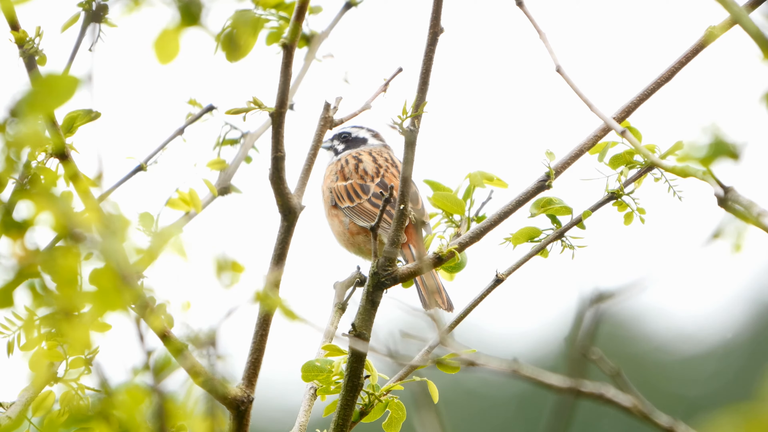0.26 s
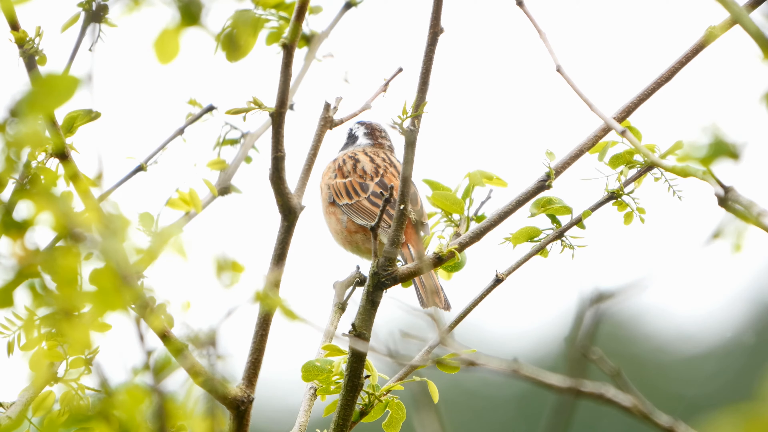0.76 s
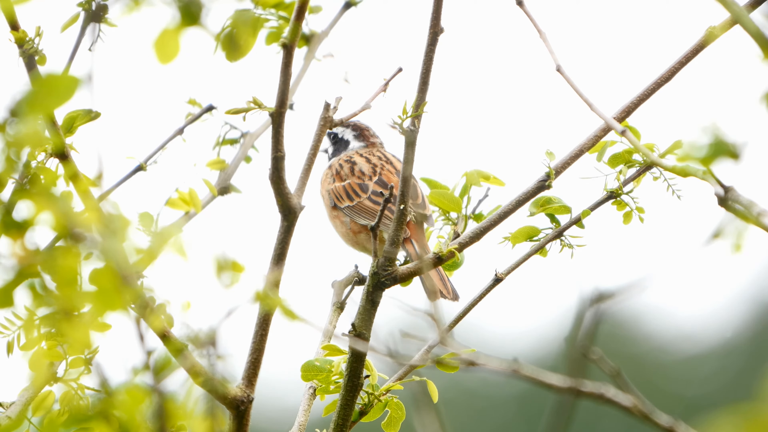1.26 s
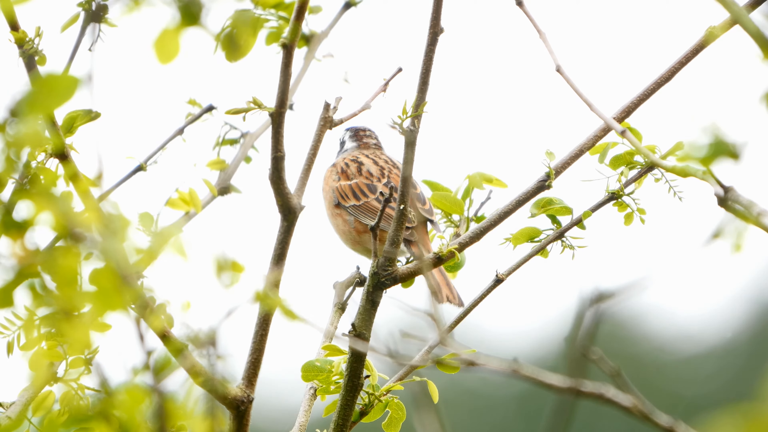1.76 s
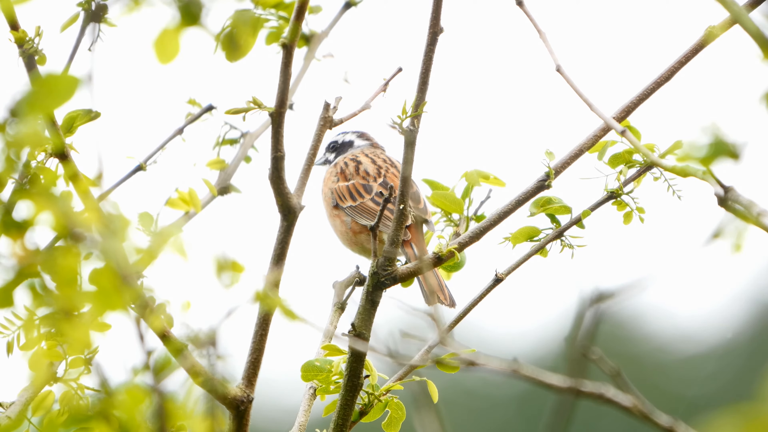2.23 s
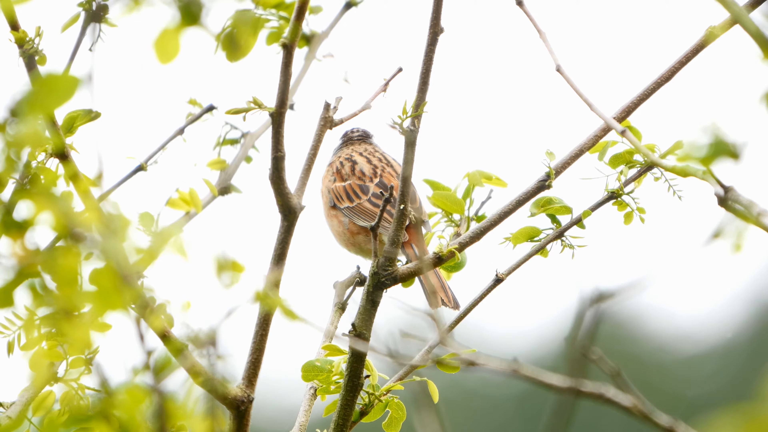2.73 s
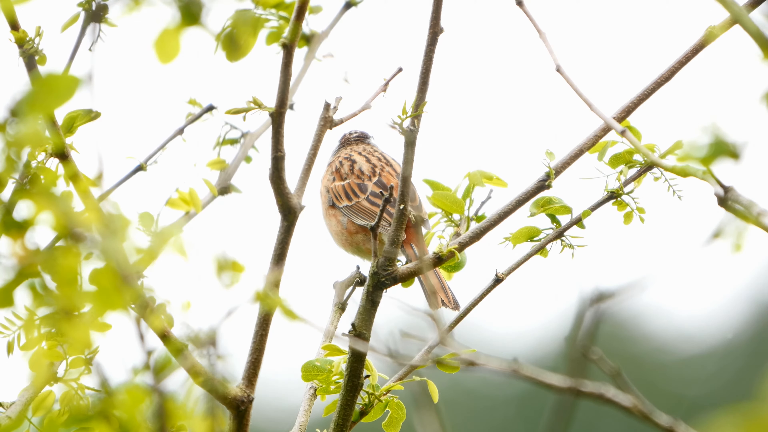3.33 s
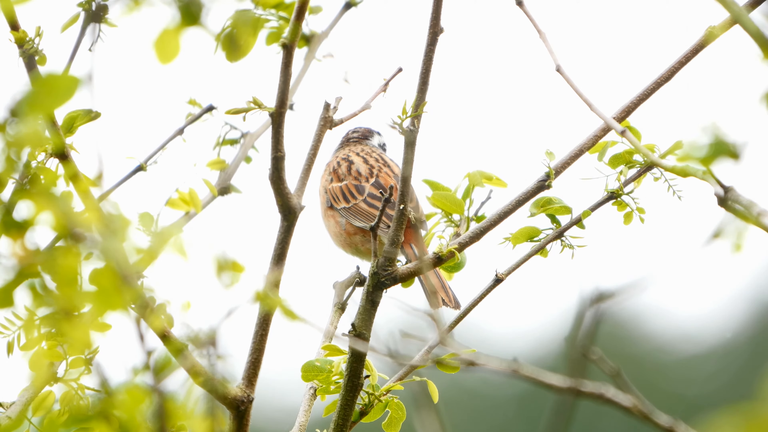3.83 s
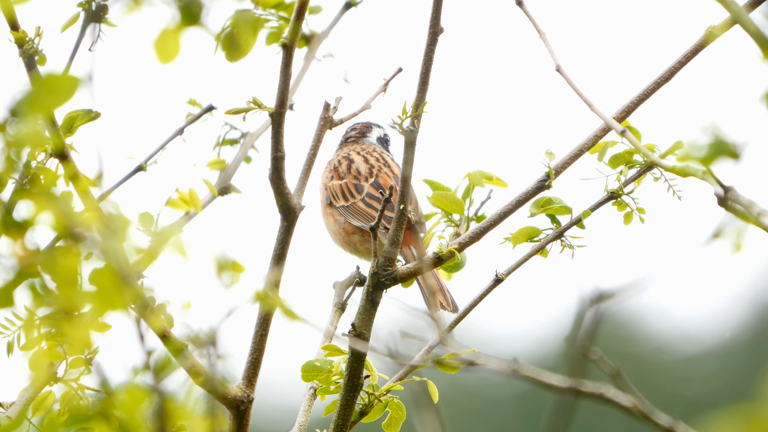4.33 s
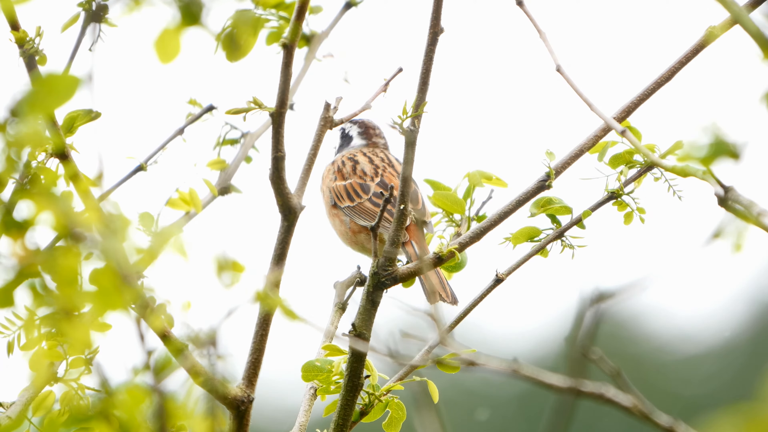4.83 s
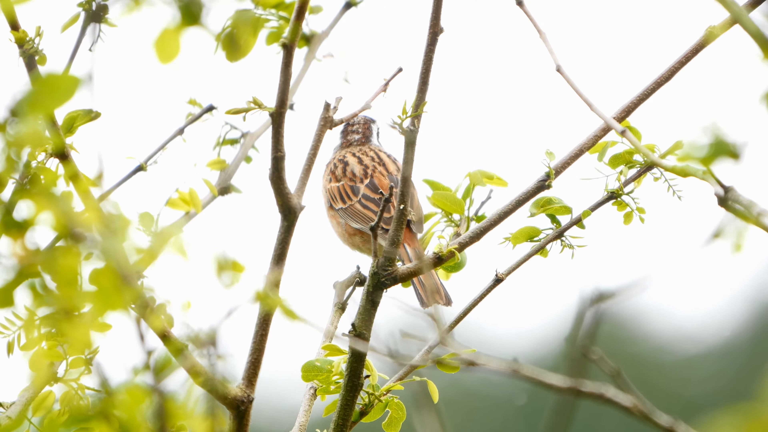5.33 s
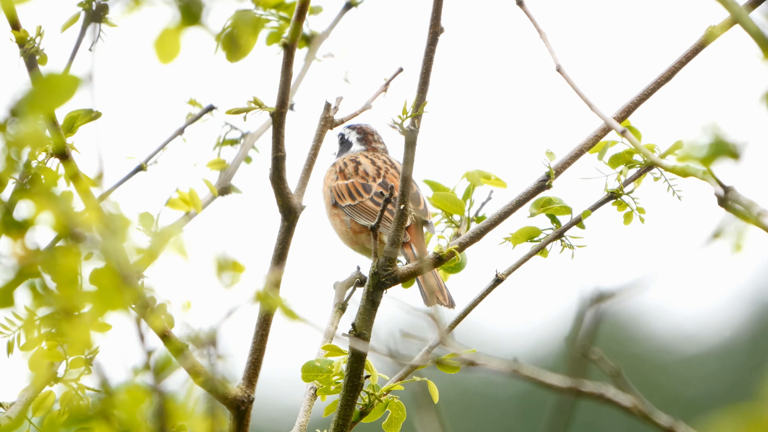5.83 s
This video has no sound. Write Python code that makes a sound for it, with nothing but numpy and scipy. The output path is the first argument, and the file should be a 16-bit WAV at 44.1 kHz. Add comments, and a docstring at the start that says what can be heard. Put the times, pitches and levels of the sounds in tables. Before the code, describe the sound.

Open woodland, mono pickup: constant muffled air noise with a barely audible drone and scattered faraway chirps. Early on, one near bird sings a bright, hurried string of pure sweeping whistles and tiny chips, each with a short echo from the trees. Softer, blurred bird calls fill the gap, including a slowing series of piped notes, before the same song starts again, slightly slower, and is cut off by the ending.

```python
"""Distant air rushes steadily over a faint low drone, and far chirps fall at random moments throughout.
A meadow bunting on a branch soon sings a quick phrase of pure sliding whistles, sines on pitch paths;
twigs and trunks scatter each note into a short tail. Other birds whistle further off, a low rumble
swells once, a far bird pipes a slowing series, and the bunting repeats its phrase a little slower."""
import sys
import numpy as np
from scipy import signal
from scipy.fft import rfft, irfft, next_fast_len
from scipy.io import wavfile
from scipy.ndimage import uniform_filter1d, map_coordinates

SR = 44100
rng = np.random.default_rng(int(sys.argv[2]) if len(sys.argv) > 2 else 0)


def file_out(sig):
    """Save sig as 16-bit WAV at sys.argv[1]."""
    # one column per channel
    cols = np.atleast_2d(sig).T
    # limit, then scale
    lim = np.clip(cols, -1, 1)
    pcm = np.round(lim * 32767).astype(np.int16)
    wavfile.write(sys.argv[1], SR, pcm)


N = 268569

# Whistled syllables. Each: attack in s, release in s, swell over the note in dB, warble depth in Hz,
# pitch path of (s into the note, Hz) before any stretch or pitch ratio.
TICK = (.003, 0.0048, 3, 0, [(0, 5360), (.021, 4320)])
ARCH = (0.027, 0.0074, 1, 0, [(0, 3678), (.035, 4127), (.064, 4342), (.081, 3580), (.087, 6670)])
SLUR = (0.028, 0.0049, 6.2, 0, [(0, 6420), (.022, 5625), (.081, 5030)])
LIFT = (0.0049, .005, 0, 0, [(0, 4820), (.006, 5150), (.017, 5900)])
SLIDE = (.003, 0.015, 6.8, 0, [(0, 4860), (.016, 4200), (.034, 3945), (.07, 3692), (.124, 3530),
         (.143, 3270)])
FALL = (0.023, 0.004, 4.5, 490, [(0, 6380), (.025, 5417), (.046, 4930)])
PEAK = (0.0087, 0.0043, 0.84, 0, [(0, 3990), (.018, 5024), (.031, 4180), (.047, 3834)])
LISP = (0.017, 0.0098, 0, 0, [(0, 8300), (.021, 7040)])
# The other side of the syrinx, sounding together with the lisp; same columns.
SECOND_VOICE = (0.0084, .006, 1, 0, [(0, 8150), (.016, 8840)])
FLICK = (0.0096, 0.0067, 0, 0, [(0, 10240), (.007, 7680), (.014, 7050)])
RISE = (0.03, 0.003, -8.5, 0, [(0, 4670), (.019, 4590), (.035, 4970), (.051, 5520), (.075, 5750)])
CHUP = (0.0031, 0.004, 0.67, 0, [(0, 4800), (.005, 2800), (.011, 3690), (.021, 3730), (.034, 2273)])
STEP = (0.021, 0.0091, 5.8, 0, [(0, 6700), (.014, 6950), (.03, 7060), (.045, 6380), (.077, 6434)])
CHIP = (0.0038, 0.0028, -1.3, 0, [(0, 4295), (.009, 4503), (.02, 3780)])
SEEP = (0.042, 0.018, 0, 0, [(0, 9860), (.03, 8750), (.07, 8420), (.12, 9380)])
# Syllables of the birds further off; same columns.
BOW = (0.022, 0.019, -0.5, 0, [(0, 3050), (.02, 3757), (.05, 4128), (.074, 4136), (.097, 3800),
       (.124, 2330), (.145, 2360)])
SWOOP = (0.0076, 0.0021, -2, 0, [(0, 2215), (.02, 3340), (.033, 5300), (.065, 6640), (.115, 7860),
         (.135, 2980)])
DROP = (0.014, .008, -10, 0, [(0, 4275), (.02, 2714), (.048, 1780)])
GLIDE = (0.023, 0.01, 0, 0, [(0, 5920), (.07, 4750), (.135, 4150)])
SIGH = (0.012, 0.0041, -5, 0, [(0, 3170), (.025, 3220), (.088, 2450)])
BURR = (0.022, 0.031, 0, 280, [(0, 2693), (.095, 4390)])
QUERY = (0.023, 0.044, 0, 0, [(0, 2920), (.03, 3450), (.095, 4070)])


def amp(db):
    """Decibels to gain."""
    return 10 ** (np.asarray(db) / 20)


def at(s, rows):
    """(s, value) rows read at time s."""
    return np.interp(s, *np.transpose(rows))


def along(points, hz):
    """(Hz, value) points read on a log frequency axis."""
    f, v = np.transpose(points)
    return np.interp(np.log(hz + 1), np.log(f + 1), v)


def curve(rows):
    """(s, value) rows as one value per sample."""
    return at(np.arange(N) / SR, rows)


def wobble(rate_hz, size):
    """Smooth random curve through rate_hz knots a second."""
    knots = rng.standard_normal(int(size * rate_hz / SR) + 4)
    return map_coordinates(knots, [np.arange(size) * rate_hz / SR])


def filtered(x, response):
    """x times a response of frequency, zero-padded against wrap-around."""
    m = next_fast_len(N + 8192)
    return irfft(rfft(x, m) * response(np.fft.rfftfreq(m, 1 / SR)), m)[:N]


def noise(response):
    """Coloured noise of rms 1."""
    x = filtered(rng.standard_normal(N), response)
    return x / np.sqrt(np.mean(x ** 2))


def add(track, s, sound):
    """Mix a sound into the track at time s."""
    room_left = track[round(s * SR):][:len(sound)]
    room_left += sound[:len(room_left)]


def whistle(syllable, ratio=1, stretch=1, warble_rate_hz=180, warble_life_s=0.023, jitter=0.006,
            overtone_db=-41, throat_hz=3900, edge_db=24, edge_curve=1.51):
    """The syrinx glides along a pitch path under attack, swell and release, any warble at the start."""
    attack_s, release_s, swell_db, warble_hz, path = syllable
    path_s, path_hz = np.transpose(path)
    path_s = stretch * path_s
    t = np.arange(int(path_s[-1] * SR)) / SR
    to_end = t[-1] - t

    glide = uniform_filter1d(np.interp(t, path_s, path_hz), size=160)
    pitch = ratio * glide * (1 + jitter * wobble(400.3, len(t)))
    warble_fade = np.exp(-(t / warble_life_s) ** 4)
    pitch += warble_hz * np.sin(2 * np.pi * warble_rate_hz * t) * warble_fade
    phase = 2 * np.pi * np.cumsum(pitch) / SR

    edges = np.clip(1 - np.minimum(t / attack_s, to_end / release_s), 0, 1) ** edge_curve
    fade = np.clip(np.minimum(t, to_end) / .001, 0, 1)  # 1 ms against clicks
    envelope = fade * amp(swell_db * (t / t[-1] - .5) - edge_db * edges)
    # the throat passes the overtone only on the lowest notes
    overtone = amp(overtone_db) / (1 + (pitch / throat_hz) ** 20)
    return np.sqrt(2) * envelope * (np.sin(phase) + overtone * np.sin(2 * phase))


def among_trees(x, twigs_db, wood_db, twig_span_s=.03, build_up_s=0.0025, count=14):
    """Direct note, sharp branch echoes that beat with it, and the wood's diffuse tail."""
    # Reverberation of the wood. Each row: frequency in Hz, 60 dB decay time in s.
    wood_decay = [(2000, 0.33), (4000, 0.44), (6500, 0.38), (10000, 0.083)]
    hz, t, z = signal.stft(rng.standard_normal(SR * 2 // 3), SR, nperseg=256)
    decay = amp(-60 * t / along(wood_decay, hz)[:, None])
    build_up = 1 - np.exp(-t / build_up_s)
    tail = signal.istft(z * decay * build_up, SR, nperseg=256)[1]
    response = amp(wood_db) * tail / np.linalg.norm(tail)
    delays = (SR * (0.0028 + twig_span_s * rng.random(count))).astype(int)
    response[delays] += amp(twigs_db) * rng.choice([-1, 1], count) / np.sqrt(count)
    response[0] = 1  # direct sound
    return signal.fftconvolve(x, response)


def air_rush(trim_db=1.38):
    """Distant air: broadband noise, its level slightly unsteady."""
    # Spectrum of the rush. Each row: frequency in Hz, relative density in dB per Hz.
    air_spectrum = [(25, -30), (69, -11), (110, -7.5), (260, -4.5), (433, -9), (760, -3), (1110, -5),
                    (2000, -8.5), (3000, -10.5), (3550, -16.5), (4260, -24.5), (6500, -30.5), (11000, -35),
                    (15500, -36)]
    # Course of the rush. Each row: time in s, level in dB before the trim.
    air_level = [(0.0, -47.5), (4.02, -47), (4.27, -46.5), (5.8, -46.5), (6.09, -47.5)]
    level_db = curve(air_level) + trim_db + 0.15 * wobble(7.4, N)
    return amp(level_db) * noise(lambda hz: amp(along(air_spectrum, hz)))


def low_drone(trim_db=-1.0):
    """Faint drone: noise through two narrow resonances."""
    # Resonances. Each row: centre in Hz, width in Hz, relative level in dB.
    resonances = [(285.5, 24, -8), (325.2, 23, -3.5)]
    # Course of the drone. Each row: time in s, level in dB before the trim.
    drone_level = [(0, -57.5), (3.7, -57), (3.88, -49.5), (4.05, -63), (6.09, -54.5)]

    def response(hz):
        """Sum of the resonance peaks."""
        return sum(amp(db) / (1 + np.square(2 * (hz - centre_hz) / width_hz))
                   for centre_hz, width_hz, db in resonances)

    return amp(curve(drone_level) + trim_db) * noise(response)


def rumble(peak_s=2.54, width_s=0.44, peak_db=-54):
    """Low band of noise that swells once on a Gaussian curve."""
    band = [(80, -40), (180, -1), (290, -7), (420, -43.5), (2000, -100)]  # (Hz, relative dB)
    swell = np.exp(-np.square((np.arange(N) / SR - peak_s) / width_s))
    return amp(peak_db) * swell * noise(lambda hz: amp(along(band, hz)))


def chorus(level_db=-63, spread=.18, count=44):
    """Farthest birds: faint chirps at random moments, heavy with echo."""
    out = np.zeros(N)
    for when, kind, pitch in rng.random((count, 3)):
        syllable = SIGH if kind < .5 else QUERY
        note = whistle(syllable, .86 + spread * (2 * pitch - 1), jitter=0.034)
        add(out, when * N / SR, amp(level_db) * among_trees(note, twigs_db=-2, wood_db=-7.5))
    return out


def piping_bird(count=19):
    """One far rising note about nine times a second, slowing a little and creeping up in pitch."""
    # The piped note. Columns: attack in s, release in s, swell over the note in dB, warble depth in Hz,
    # pitch path of (s into the note, Hz) before the pitch ratio.
    pipe_note = (0.014, 0.031, -7.5, 0, [(0, 1763), (.025, 1908), (.07, 2070)])
    # Loudness of the series. Each row: time in s, level in dB.
    pipe_level = [(3.74, -55), (4.4, -49), (4.9, -54), (5.7, -52)]
    start_s, gap_s, slowing_s = 3.74, .106, .00054  # slowing_s: growth of each gap
    start_ratio, climb_per_s = 0.99, 0.0199  # pitch ratio and its rise
    out = np.zeros(N)
    for k in range(count):
        elapsed_s = k * (gap_s + slowing_s * k / 2)
        s = start_s + elapsed_s
        note = whistle(pipe_note, start_ratio + climb_per_s * elapsed_s)
        add(out, s, amp(at(s, pipe_level)) * among_trees(note, twigs_db=-17.5, wood_db=-4.5))
    return out


def far_birds(flutter_db=0.5):
    """Distant whistles flutter and dull on their way through leaves; their echo builds up slowly."""
    # Birds deeper in the wood. Each row: start in s, syllable, level in dB before the foliage, pitch ratio.
    neighbours = [(1.345, SIGH, -49.5, 0.96), (1.809, QUERY, -52.5, .74), (1.94, SIGH, -49.5, 0.96),
                  (1.964, BURR, -50.5, 1.5), (2.004, QUERY, -52.5, 1.12), (2.105, DROP, -42.5, 0.92),
                  (2.14, SIGH, -53.5, 1.14), (2.531, SIGH, -50, 0.97), (2.885, QUERY, -48.5, 1.03),
                  (2.96, BURR, -52.5, 1.06), (3.04, BURR, -46.5, .94), (3.27, SWOOP, -49.5, 1),
                  (3.515, BOW, -45.5, .99), (3.628, QUERY, -61, 1.23), (3.786, SWOOP, -48, 1.01),
                  (3.795, QUERY, -55.5, 1.1), (4.018, BOW, -44.5, 1), (4.029, GLIDE, -51.5, 1.01),
                  (4.295, BOW, -46, 1.025), (4.572, BOW, -46, 1.044), (4.691, QUERY, -47, 0.88),
                  (5.587, QUERY, -44, 0.87), (6.071, BOW, -35, 0.88)]
    # Treble lost to the leaves. Each row: frequency in Hz, gain in dB.
    foliage = [(4200, -1.5), (5200, -12), (7700, -22)]
    out = np.zeros(N)
    for s, syllable, db, ratio in neighbours:
        note = whistle(syllable, ratio, warble_rate_hz=87, warble_life_s=0.095, jitter=0.008)
        note = note * amp(db + flutter_db * wobble(64.8, len(note)))
        add(out, s, among_trees(note, twigs_db=-7.0, wood_db=-9.5, build_up_s=0.11))
    return filtered(out, lambda hz: amp(along(foliage, hz)))


def bunting():
    """Near singer, phrase given twice; its head turns, so each syllable meets different branches."""
    # The phrase. Each row: first start in s, syllable, level in dB, level in the repeat in dB.
    song = [(.391, TICK, -36, -37.5), (0.537, ARCH, -29, -29.5), (0.624, SLUR, -30.5, -30),
            (.785, LIFT, -34, -36), (0.794, SLIDE, -26, -26), (0.984, FALL, -29.5, -30),
            (1.032, PEAK, -28.5, -28.5), (1.119, FALL, -31.5, -30.5), (1.168, PEAK, -28, -28.5),
            (1.258, SECOND_VOICE, -53, -48.5), (1.259, LISP, -36, -35.5), (1.277, FLICK, -36.5, -39),
            (1.32, SECOND_VOICE, -50.5, -47), (1.322, LISP, -36.5, -34.5), (1.339, FLICK, -34.5, -37),
            (1.388, RISE, -29, -31), (1.463, CHUP, -32, -31.5), (1.537, STEP, -33, -35),
            (1.628, CHIP, -35.5, -35), (1.689, CHIP, -34.5, -33), (1.743, CHIP, -32.5, -33),
            (1.819, SEEP, -49, -56)]
    # The beak points away in the second phrase. Each row: time in s, overtone level in dB.
    beam = [(.8, -37), (4.8, -49)]
    repeat_after_s, repeat_drag = 4.251, 0.0035  # drag: share by which the repeat is slower
    slide_hurry = 0.95  # share of its time the long slide takes in the repeat
    out = np.zeros(N)
    for first_s, syllable, first_db, again_db in song:
        again_s = first_s + repeat_after_s + repeat_drag * (first_s - song[0][0])
        hurry = slide_hurry if syllable == SLIDE else 1
        for s, db, stretch in ((first_s, first_db, 1), (again_s, again_db, hurry)):
            note = whistle(syllable, stretch=stretch, overtone_db=at(s, beam))
            add(out, s, amp(db) * among_trees(note, twigs_db=-9.0, wood_db=-12.0))
    return out


def scene():
    """Everything at one microphone."""
    background = air_rush() + low_drone() + rumble()
    birds = chorus() + piping_bird() + far_birds() + bunting()
    return (background + birds)[None]


def record(dry):
    """The recorder keeps nothing above its band limit."""
    top_hz = 15800
    return np.array([filtered(channel, lambda hz: hz < top_hz) for channel in dry])


dry = scene()
out = record(dry)
file_out(out)
```